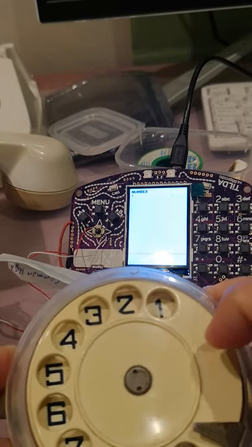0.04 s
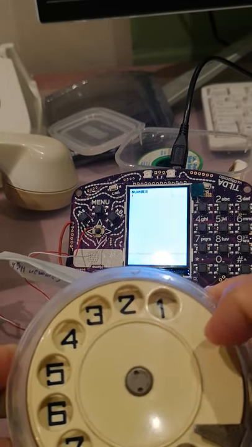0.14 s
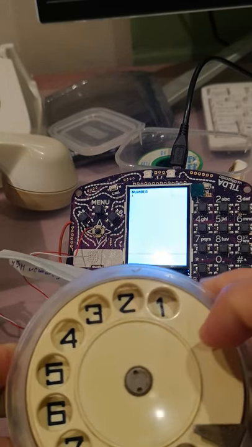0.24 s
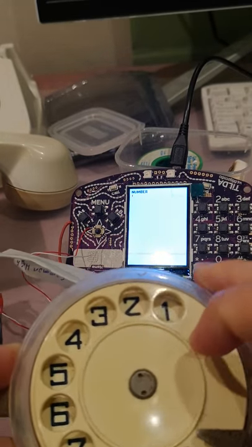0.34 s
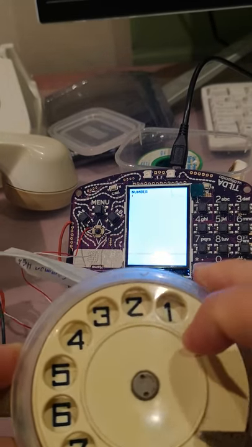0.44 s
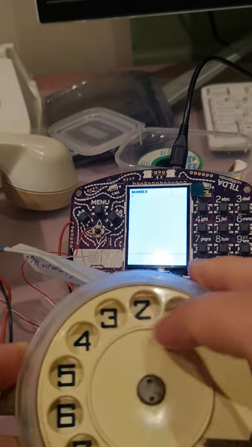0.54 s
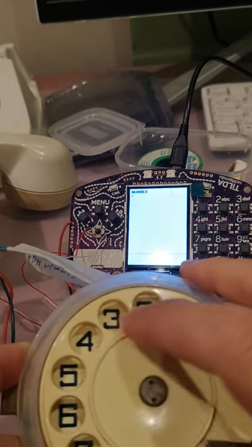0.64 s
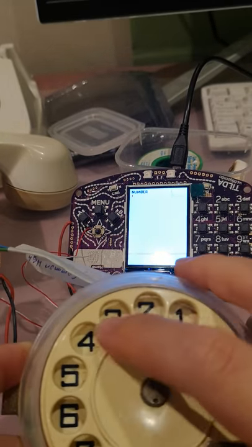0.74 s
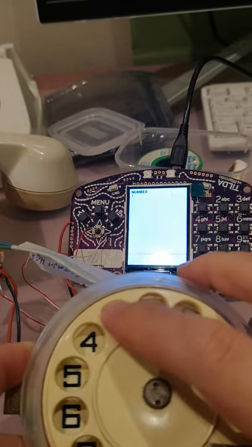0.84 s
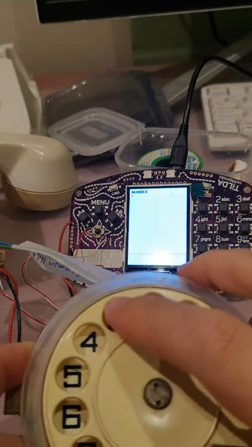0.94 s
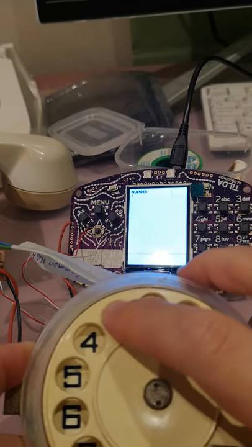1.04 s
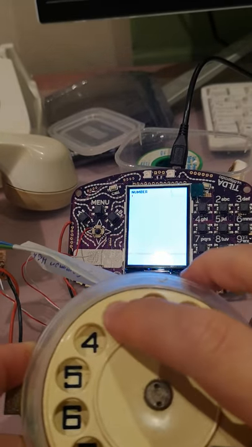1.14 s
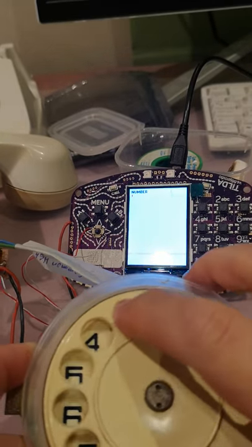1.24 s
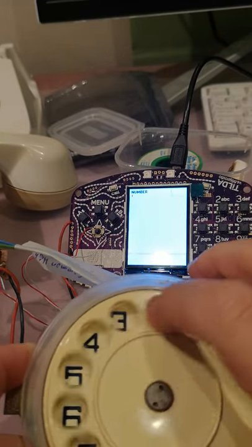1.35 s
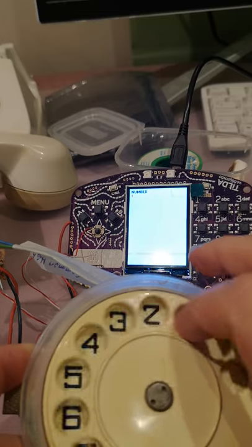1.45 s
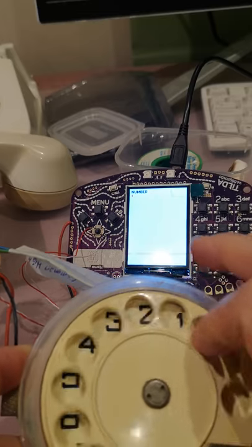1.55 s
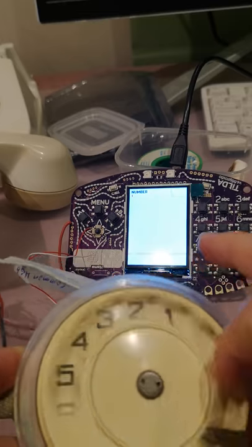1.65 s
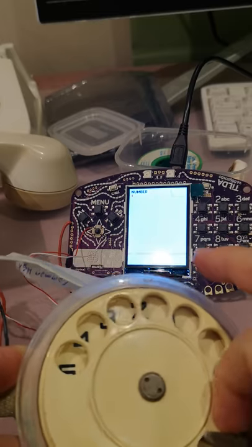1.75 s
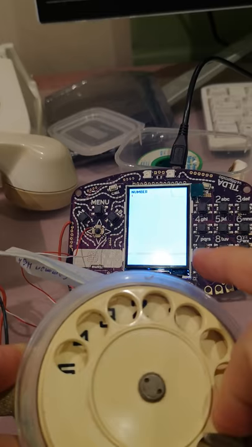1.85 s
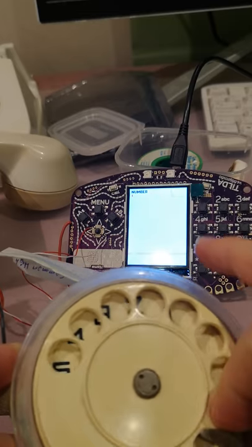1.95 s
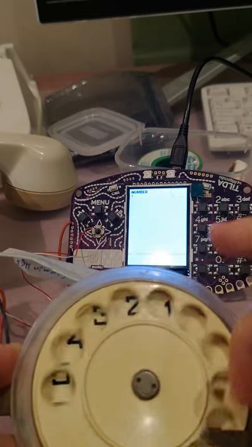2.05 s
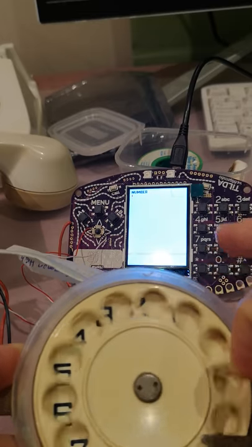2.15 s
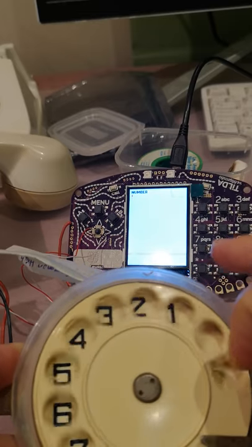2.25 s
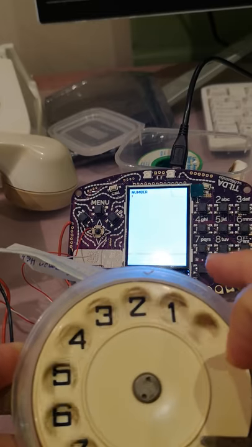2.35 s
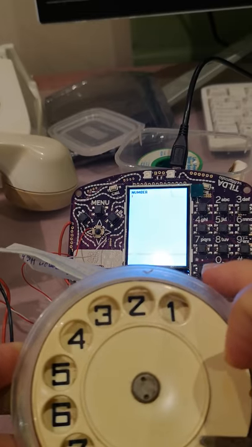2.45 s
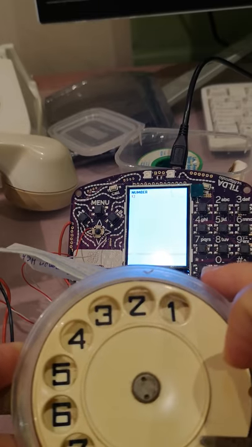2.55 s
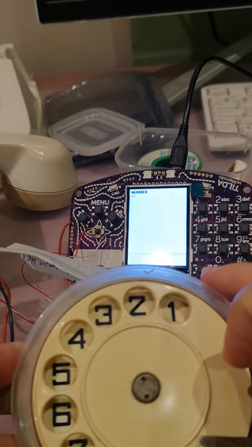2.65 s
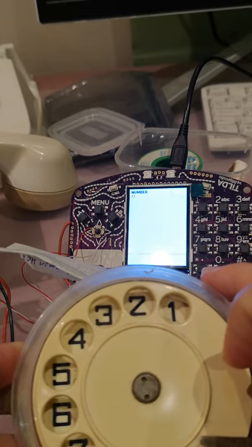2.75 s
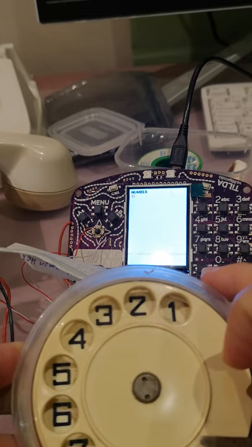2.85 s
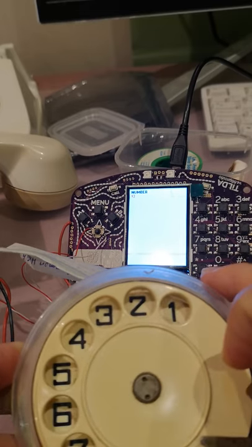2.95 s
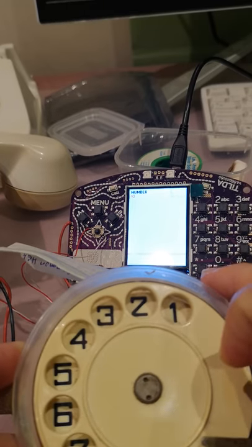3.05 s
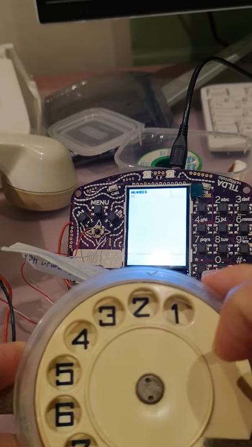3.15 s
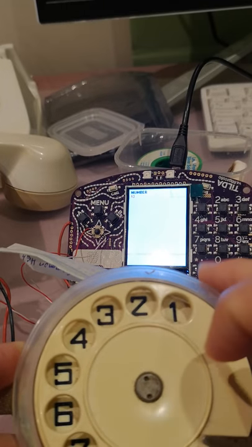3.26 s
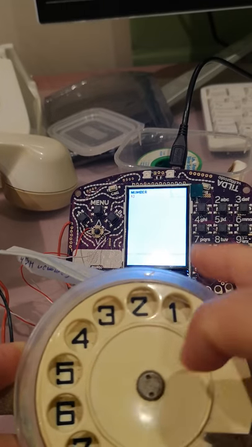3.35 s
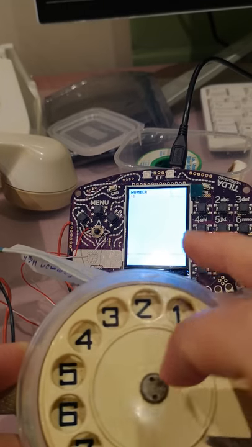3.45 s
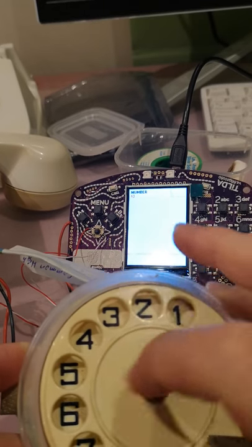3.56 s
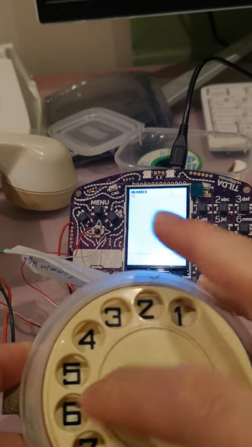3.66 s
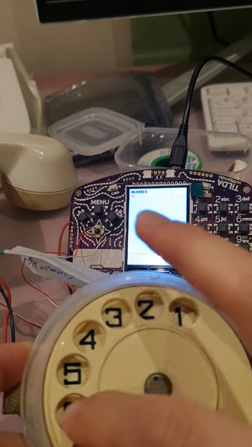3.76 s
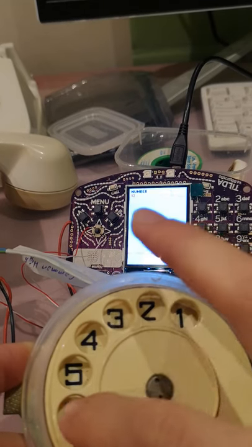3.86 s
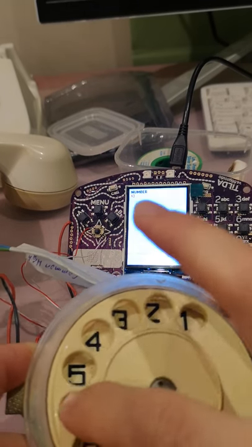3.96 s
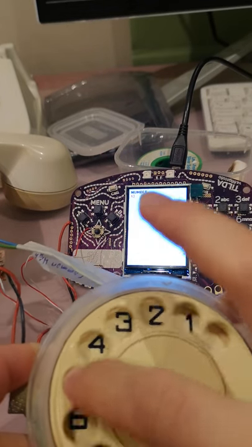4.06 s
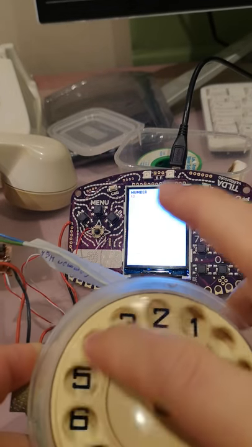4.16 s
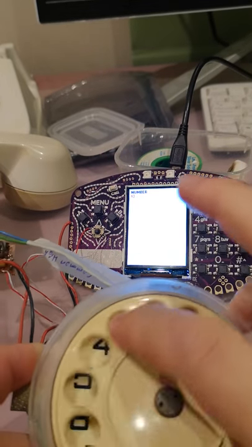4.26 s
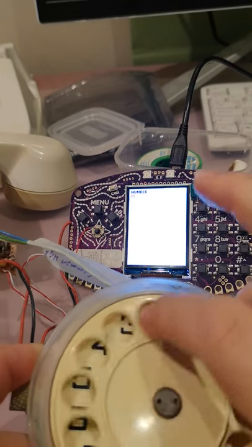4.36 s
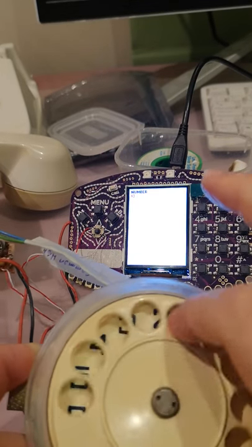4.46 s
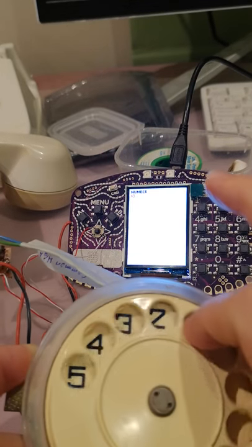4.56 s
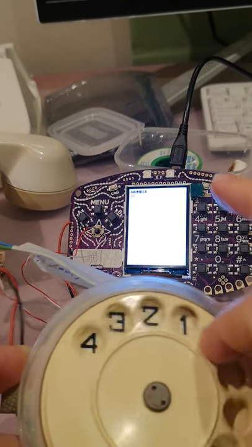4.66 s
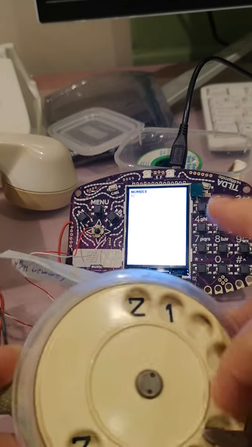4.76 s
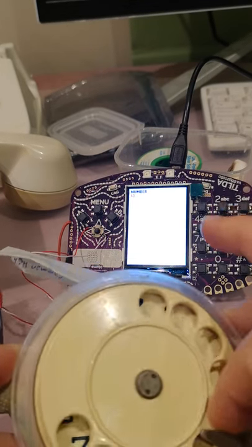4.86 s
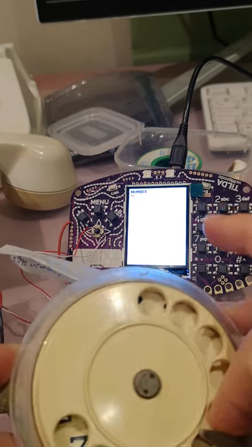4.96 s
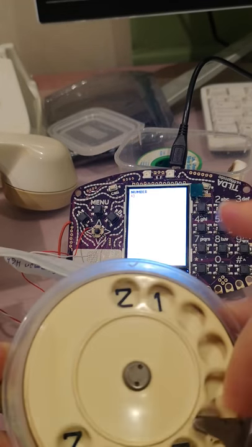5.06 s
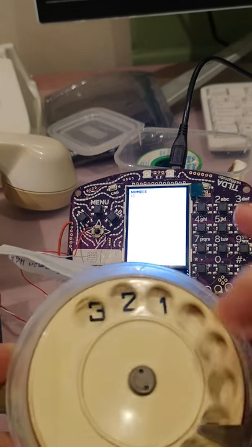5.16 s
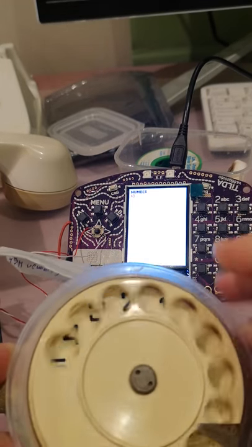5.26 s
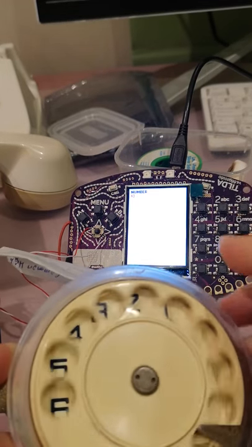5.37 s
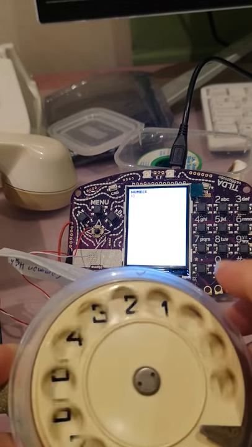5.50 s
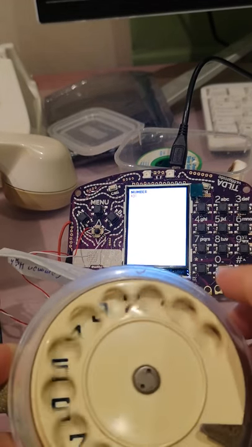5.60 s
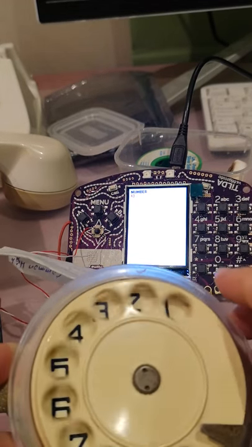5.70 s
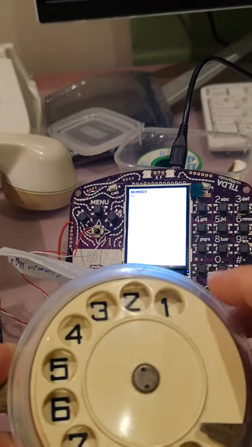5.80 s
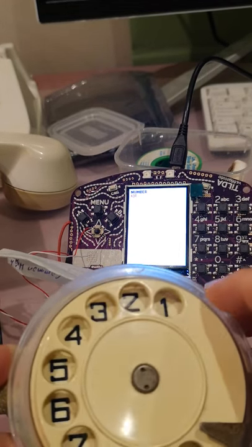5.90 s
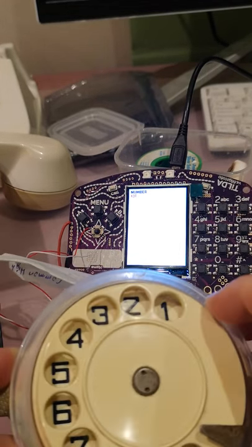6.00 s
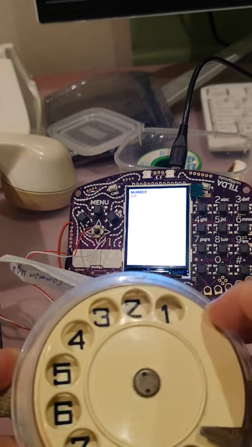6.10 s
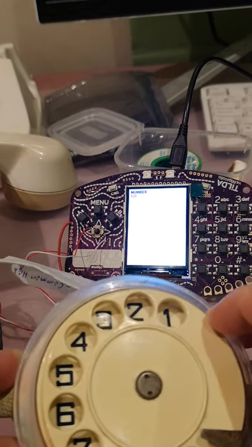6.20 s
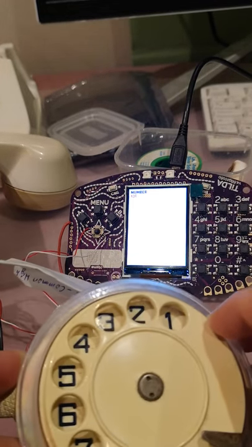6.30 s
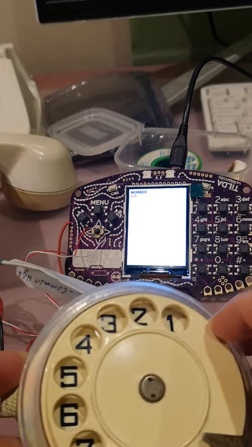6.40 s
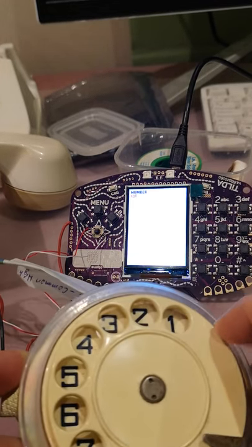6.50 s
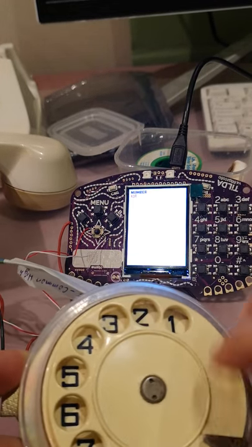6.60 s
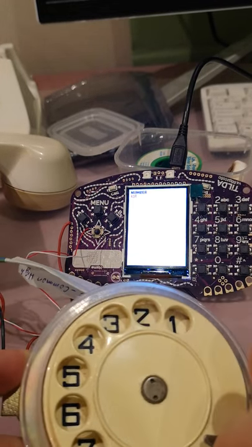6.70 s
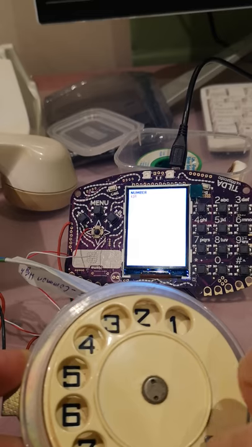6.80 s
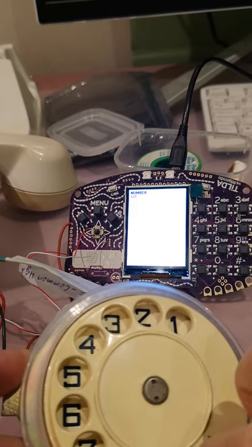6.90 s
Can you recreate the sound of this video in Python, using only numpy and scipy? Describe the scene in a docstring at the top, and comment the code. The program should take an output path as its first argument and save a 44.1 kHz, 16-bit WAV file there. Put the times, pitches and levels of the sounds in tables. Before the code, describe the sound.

A rotary phone dial handled close up: faint finger rubs and case ticks, then a short burst of metallic ratcheting ending in a hard click. The wheel springs back with a buzzing friction whirr, bumps its stop and clicks slower and weaker. A quiet gap, then a longer wind and longer return. Small dry room, soft low rumble, slight hiss and short reflections.

```python
"""In a small quiet room, a bare rotary telephone dial held close to the microphone dials two digits.
Winding drags a pawl over its ratchet; let go, the wheel spins home against a whirring friction governor,
knocks on its stop, and the gear train coasts on with slowing ratchet clicks. Hands tick and rub on the dial.
Blows and random slips ring filters for the wheel, case and pawl; coloured noise makes the room tone."""
import sys
import numpy as np
from scipy import signal
from scipy.fft import rfft, irfft
from scipy.io import wavfile

SR = 44100
rng = np.random.default_rng(int(sys.argv[2]) if len(sys.argv) > 2 else 0)


def to_wav(sig):
    """Store sig (one row per channel, or 1-D mono) as 16-bit WAV at the path in sys.argv[1].

    Samples outside -1..1 are clipped; the rate is SR.
    """
    pcm = np.clip(np.atleast_2d(sig), -1, 1) * 32767
    pcm = np.round(pcm).astype(np.int16)
    wavfile.write(sys.argv[1], SR, pcm.T)  # frames by channels


N = 306054
SIZE = 2048  # samples in the sound of one contact

# resonances of the dial's wheel and case: pitch_hz, width_hz, left_lift_db, right_lift_db
CASE_MODES = [(782.6, 140, 1, 8.5), (1070, 260, 14.5, 15.5), (1510, 130, -3, 3.5), (1660, 450, -4.5, 1),
              (2187, 220, 3.5, -8.5), (2870, 240, 10, 5), (3090, 200, -8, -6), (4590, 130, 6, -2.5),
              (6265, 780, -4, 2.5), (7660, 890, 9, 4), (9200, 700, 3.5, 8)]
# force spectrum of clicking small parts and of the wheel let go: pitch_hz, level_db
CLICK_FORCE = [(200, -42), (700, -17), (1500, -5.5), (2600, -1.5), (3500, 8), (5000, -9.5), (8000, -8.5),
               (11000, -23.5), (16000, -42)]
# force spectrum of rubbing parts: pitch_hz, level_db
RUBBING_FORCE = [(150, -45.5), (450, -28), (800, -9.5), (1400, 1), (2600, 4.5), (3600, 3), (5200, -6.5),
                 (8000, -19.5), (11000, -31), (16000, -36)]


def amp(db):
    """Decibels to gain."""
    return 10 ** (np.asarray(db) / 20)


def colour(points, size):
    """A (Hz, dB) curve, drawn over log frequency, at the frequencies of a transform."""
    hz, db = np.transpose(points)
    return np.interp(np.log(np.fft.rfftfreq(size, 1 / SR) + 1), np.log(hz), db)


def unit(x):
    """Scale to rms 1."""
    return x / np.sqrt(np.mean(x ** 2))


def noise(points):
    """Noise of a given colour, rms 1."""
    spectrum = rfft(rng.standard_normal(N)) * amp(colour(points, N))
    return unit(irfft(spectrum, N))


def walk(rate):
    """Random wander with a spread near 1: straight lines between this many random points per second."""
    return np.interp(np.arange(N) / SR * rate, np.arange(N // 100), rng.standard_normal(N // 100))


def hump(t, middle_s, width_s):
    """A smooth rise and fall, 1 at its middle."""
    return np.exp(-((t - middle_s) / width_s) ** 2)


def motion(t, start_s, stop_s, rise_s, fall_s):
    """Loudness of a part that speeds up, runs steadily and, from stop_s, coasts to a halt."""
    rise = np.clip((t - start_s) / rise_s, 0, 1)
    fall = np.clip(1 - (t - stop_s) / fall_s, 0, 1)
    return (rise * fall) ** 2


def add(out, s, sound):
    """Mix a short sound in at time s."""
    i = int(s * SR)
    out[:, i:i + sound.shape[-1]] += sound[..., :N - i]


def convolve(x, response):
    """Pass a signal through a two-channel response."""
    return signal.fftconvolve(np.atleast_2d(x), response, axes=1)[:, :N]


def room_tone():
    """A wavering low rumble and a fading drone, each alike at both ports, under faint, mostly separate hiss."""
    t = np.arange(N) / SR
    # spectra of the rumble and of the hiss: pitch_hz, level_db_per_hz
    rumble_colour = [(12, -1), (25, 4.5), (40, -6.5), (60, -8), (80, -19.5), (105, -13), (150, -16.5),
                     (220, -20.5), (300, -28.5), (450, -39.5), (900, -68)]
    hiss_colour = [(30, -11.5), (130, 3), (250, 3), (400, -7.5), (600, -10.5), (1100, -9.5), (2400, -9.5),
                   (5000, -19), (10000, -25), (16000, -29.5)]
    # level of the rumble before it wavers: time_s, level_db
    rumble_level = [(0, -51), (1.6, -44.5), (2.4, -47.5), (3.3, -59.5), (4.6, -55), (5.55, -54.5), (6, -60),
                    (6.94, -64)]
    waver_db = 1.2 * walk(14)
    rumble = noise(rumble_colour) * amp(np.interp(t, *np.transpose(rumble_level)) + waver_db)
    # the drone holds, then dies away; early on it swells once
    hold_s, fade_db_per_s = 1.68, 5.5
    swell_at_s, swell_width_s, swell_db = .775, .045, 16.5
    drone_db = -58.5 - fade_db_per_s * np.maximum(t - hold_s, 0)
    drone_db = drone_db + swell_db * hump(t, swell_at_s, swell_width_s)
    drone_colour = [(150, -57), (176, -22.0), (188, 0.5), (200, -11.0), (240, -31.5), (500, -85.5)]
    drone = noise(drone_colour) * amp(drone_db)
    shared_hiss = noise(hiss_colour) * amp(-85.5)
    separate_hiss = np.array([noise(hiss_colour), noise(hiss_colour)]) * amp(-69.5)
    return rumble + drone + shared_hiss + separate_hiss


def reflections(x, db, t60, delay_s, tone):
    """Diffuse echoes as decaying coloured noise, unrelated at the two ports."""
    t = np.arange(SR // 2) / SR
    tail = irfft(rfft(rng.standard_normal((2, len(t)))) * amp(colour(tone, len(t))), len(t))
    # silent until delay_s, full at twice that
    tail = tail * amp(-60 * t / t60) * np.clip(t / delay_s - 1, 0, 1)
    return amp(db) * convolve(x, unit(tail) / np.sqrt(len(t)))


def around_recorder(x, bends=((4900, 3.5), (8400, 5))):
    """Treble bends round the recorder and reaches the right port out of step: all-passes (Hz, Q)."""
    right = x[1]
    for hz, q in bends:
        _, poles = signal.iirpeak(hz, q, fs=SR)
        right = signal.lfilter(poles[::-1], poles, right)
    return np.array([x[0], right])


def body(force, modes, shadow):
    """Causal, minimum-phase response of the dial to one contact, at both ports; mean energy 1."""
    # the right port faces away and loses treble, by a share that each contact sets: pitch_hz, level_db
    port_shadow = [(1000, -1.5), (2000, 0.5), (2800, -2), (4200, -1), (6000, -11), (8000, -7.5),
                   (10000, 1.5)]
    f = np.fft.rfftfreq(SIZE, 1 / SR)
    db = colour(force, SIZE) + np.outer([0, shadow], colour(port_shadow, SIZE))
    for hz, width, left_db, right_db in modes:
        db = db + np.outer([left_db, right_db], 1 / (1 + (2 * (f - hz) / width) ** 2))
    cepstrum = irfft(np.log(amp(db)))[:, :SIZE // 2]
    response = irfft(np.exp(2 * rfft(cepstrum, SIZE)))
    return unit(response) / np.sqrt(SIZE)


def shifted(modes, share):
    """The same resonances, all moved by a share of their frequency."""
    return np.array(modes) * [1 + share, 1, 1, 1]


def strikes(table, force_db, modes, shadow, chatter_s, scrape, detune, count, vary_db=0.0, pressed=0.017):
    """Each blow is a few quick bounces that grow and fade, with scraping; levels are rms over 5 ms."""
    out, t = np.zeros((2, N)), np.arange(SIZE) / SR / chatter_s
    treble = colour([(4500, 0), (6500, 1)], SIZE)
    window = .005 * SR
    for s, db, bright_db in table:
        # every blow lands a little differently and shifts and may reweight the resonances
        seated = shifted(modes, detune * rng.standard_normal())
        seated[:, 2:] += vary_db * rng.standard_normal((len(modes), 2))
        # a bright, scraping blow stays pressed on and rings less
        seated[:, 2:] *= 1 - pressed * bright_db
        # part of the scraping is common to both ports, part is separate
        grain = rng.standard_normal((3, SIZE))
        force = scrape * (grain[0] + 1.2 * grain[1:]) * t * np.exp(-2 * t ** 2)
        bounces = (np.arange(count) + rng.random(count)) / count
        bounce_at = (bounces * chatter_s * SR).astype(int)
        force[:, bounce_at] += rng.choice([-1, 1], count) * np.sin(np.pi * bounces)
        sound = irfft(rfft(force) * rfft(body(force_db, seated, shadow)) * amp(bright_db * treble))
        add(out, s, unit(sound) * np.sqrt(window / SIZE) * amp(db))
    return out


def friction(response, rate, spread_db, apart):
    """Tiny slips of random size, rate per second, ring the dial; a share reaches each port separately."""
    slips = (rng.random((3, N)) < rate / SR) * rng.choice([-1, 1], (3, N))
    slips = slips * amp(spread_db * np.clip(rng.standard_normal((3, N)), -2, 2))
    return unit(convolve(slips[0] + apart * slips[1:], response))


def roaming(force_db, shadow, rate, spread_db, apart, detune, swell_db, count):
    """Friction at several spots, each with its own pitch of ring, that take over from one another."""
    spots = []
    for share in np.linspace(-detune, detune, count):
        response = body(force_db, shifted(CASE_MODES, share), shadow)
        spots.append(friction(response, rate, spread_db, apart))
    weights = np.array([amp(swell_db * walk(60)) for _ in spots])
    weights /= np.sqrt(np.sum(weights ** 2, axis=0))
    return sum(w * spot for w, spot in zip(weights, spots))


def fingers():
    """Short dull slides of a fingertip on the plastic: many tiny slips of skin ring the case."""
    # each slide: middle_s, length_s, level_db
    slides = [(0.373, 0.04, -56.5), (1.104, 0.026, -64), (1.295, .03, -62.5), (3.337, 0.045, -60),
              (6.677, 0.18, -70)]
    t = np.arange(N) / SR
    touch = sum(amp(db) * hump(t, s, length / 2) for s, length, db in slides)
    skin = [(300, -3), (650, -25), (930, -3.5), (1250, -6.5), (2500, 2.5), (4500, -9.5), (9000, -19.5),
            (16000, -60)]
    return touch * friction(body(skin, CASE_MODES, shadow=0.95), rate=9000, spread_db=3.0, apart=1.0)


def hand_ticks():
    """The case ticks in the hand: very short contacts ring it faintly."""
    # each tick: start_s, level_db, brightness_db
    ticks = [(.2425, -58.5, -12), (.2695, -50, -5), (.2925, -51, -9), (4.899, -47, -8.5), (4.919, -53, -20),
             (6.4455, -59.5, 5), (6.6105, -53, 1)]
    # force spectrum: pitch_hz, level_db
    tick_force = [(200, -38), (800, -11), (1100, -31), (1400, 8.5), (2400, 1.5), (4000, -8), (7000, -20),
                  (16000, -43)]
    return strikes(ticks, tick_force, CASE_MODES, shadow=0.17, chatter_s=0.00081, scrape=0.88,
                   detune=0.053, count=2)


def gears():
    """The gear train rubs softly while the wheel is wound."""
    # each run: start_s, stop_s, level_db
    gear_runs = [(1.314, 1.805, -49.5), (4.02, 4.864, -52.5)]
    rise_s, fall_s = 0.077, 0.057
    t = np.arange(N) / SR
    rub = friction(body(RUBBING_FORCE, CASE_MODES, shadow=.8), rate=840, spread_db=8.5, apart=0.47)
    return rub * sum(amp(db) * motion(t, start_s, stop_s, rise_s, fall_s) for start_s, stop_s, db in gear_runs)


def spring(hz=1168, beat_hz=11, t60=0.5):
    """The return spring sings briefly in two close modes as it takes up the load."""
    out, t = np.zeros((2, N)), np.arange(SR // 2) / SR
    ring = np.sin(2 * np.pi * hz * t) + 0.26 * np.sin(2 * np.pi * (hz - beat_hz) * t)
    for s, db, rise_s in [(2.052, -40.5, 0.0079), (5.092, -42.5, 0.0065)]:
        add(out, s, ring * amp(db - 60 * t / t60) * (1 - np.exp(-t / rise_s)))
    return out


def small_part_clicks():
    """Small parts of the dial click at uneven moments during the return and ring the case."""
    # each click: start_s, level_db, brightness_db
    part_clicks = [(2.099, -40, 1), (2.1355, -32.5, 2), (2.3015, -30.5, -3), (2.382, -31, 7),
                   (5.164, -38, 16), (5.292, -31, 6), (5.312, -32, -18), (5.3285, -34, -8),
                   (5.673, -32.5, -5.5)]
    return strikes(part_clicks, CLICK_FORCE, CASE_MODES, shadow=1.3, chatter_s=0.0025, scrape=0.22,
                   detune=0.051, count=3)


def finger_releases():
    """The finger lets the wheel go with a scraping click that rings the case."""
    # each release: start_s, level_db, brightness_db
    releases = [(2.0503, -28.5, -8.5), (5.0815, -52.5, -5.5), (5.0848, -34, -2)]
    return strikes(releases, CLICK_FORCE, CASE_MODES, shadow=0.96, chatter_s=.0042, scrape=0.89,
                   detune=0.012, count=4)


def wheel_stops():
    """The wheel knocks at an end of its travel and rings the case."""
    # each knock: start_s, level_db, brightness_db
    knocks = [(1.7399, -34.5, 4.5), (2.5113, -22.5, -1.5), (5.7988, -22.5, -3.5)]
    # force spectrum: pitch_hz, level_db
    knock_force = [(200, -38.5), (500, -27), (800, -12), (1080, -4.5), (1400, 4), (2100, 6.5), (2900, -4.5),
                   (5500, -6.5), (8000, -21), (11000, -30.5), (16000, -33.5)]
    return strikes(knocks, knock_force, CASE_MODES, shadow=0.36, chatter_s=.002, scrape=1.1,
                   detune=0.011, count=3)


def governor():
    """Flyweights rub inside their cup, harder once a turn, and catch on grit in short spurts."""
    # the wheel spins home: governor_start_s, wheel_stop_s, rubbing_db, grit_db, extra_grit_at_first_db
    spins = [(2.083, 2.511, -38.5, -44.5, 8), (5.108, 5.805, -39, -43, 1)]
    # force spectrum of the grit: pitch_hz, level_db
    grit_force = [(500, -27), (3000, -25), (5200, -1), (7000, 8.5), (8500, 6.5), (9800, -3.5),
                  (11000, -12.5), (14000, -15), (16000, -38)]
    turns_per_s = 21  # on average; the wobble below sways it
    spin_up_s, run_down_s, grit_run_down_s = 0.061, 0.24, 0.057
    # the flyweights first overshoot and bite harder: time after the start, and half width
    surge_at_s, surge_width_s = .102, .06
    t = np.arange(N) / SR
    spurts, wobble = walk(260), 0.059 * walk(12)  # wobble in turns
    rub = roaming(RUBBING_FORCE, shadow=0.94, rate=1200, spread_db=-1.0, apart=0.5,
                  detune=0.026, swell_db=8, count=3)
    grit = roaming(grit_force, shadow=0.91, rate=300, spread_db=12.5, apart=1.0,
                   detune=0.048, swell_db=3.5, count=3)
    grit = unit(grit * amp(2.4 * spurts))
    # the wheel's low ring and its rasp swell separately
    low = signal.sosfiltfilt(signal.butter(2, 1700, fs=SR, output="sos"), rub)
    ring = low * amp(1.2 * walk(79))
    rasp = (rub - low) * amp(1.2 * walk(90))
    out = 0
    for start_s, stop_s, rub_db, grit_db, surge_db in spins:
        turn = np.cos(2 * np.pi * (turns_per_s * (t - start_s - surge_at_s) + wobble))
        surge = surge_db * hump(t, start_s + surge_at_s, surge_width_s)
        rubbing = unit((ring + rasp * amp(1.4 * turn + 0.33 * surge)) * amp(2.4 * spurts))
        out = out + rubbing * amp(rub_db) * motion(t, start_s, stop_s, spin_up_s, run_down_s)
        grit_gain = amp(grit_db + surge + 2.8 * turn)
        out = out + grit * grit_gain * motion(t, start_s, stop_s, spin_up_s, grit_run_down_s)
    return out


def tooth_marks(first, last, drop_share):
    """Places along the ratchet, in teeth, where the pawl lifts (whole numbers) or drops."""
    marks = np.add.outer(np.arange(int(last) + 1), [0, drop_share]).ravel()
    slack = 1e-6
    return marks[(marks > first - slack) & (marks < last + slack)]


def pawl_clicks(times, marks, lift_db, drop_db):
    """Rows (s, level dB, brightness dB): bright lifts and dull drops alternate, and harder clicks are duller."""
    lift_bright_db, drop_bright_db = 3, -1.46
    level_scatter_db, bright_scatter_db = -1.8, -1.8
    dulling, dull_above_db = 0.68, -35  # dB of brightness lost for each dB that a click is harder than this
    drops = marks % 1 > 0
    chance = rng.standard_normal((len(marks), 2))
    db = np.where(drops, drop_db, lift_db) + level_scatter_db * chance[:, 0]
    bright_db = np.where(drops, drop_bright_db, lift_bright_db)
    bright_db = bright_db - dulling * np.maximum(db - dull_above_db, 0)
    bright_db = bright_db + bright_scatter_db * chance[:, 1]
    return np.column_stack([times, db, bright_db])


def winding_clicks():
    """While the finger winds the wheel, the pawl clicks at the finger's pace and force."""
    # how far the finger has wound the wheel, a list for each digit: time_s, teeth_passed
    wind_travel = [
        [(1.3105, .35), (1.389, 2.35), (1.452, 5), (1.492, 6.35), (1.606, 9), (1.669, 11), (1.7173, 13.35),
         (1.757, 16), (1.8057, 16.35)],
        [(4.0123, 0), (4.0805, 1), (4.122, 2), (4.276, 8), (4.323, 9), (4.391, 11.46), (4.413, 12),
         (4.511, 15.46), (4.6894, 19.46), (4.746, 21.46), (4.8217, 28), (4.881, 30), (4.9416, 30.46)],
    ]
    # how hard the pawl strikes before scatter, a list for each digit: time_s, lift_db, drop_db
    wind_force = [
        [(1.31, -37, -33.5), (1.42, -31.5, -33), (1.55, -33, -31), (1.61, -36, -28), (1.68, -31.5, -32.5),
         (1.735, -22.5, -22), (1.76, -39, -33.5), (1.81, -35, -32.5)],
        [(4.01, -40, -38.5), (4.25, -34, -34.5), (4.32, -32.5, -32.5), (4.46, -33, -30), (4.65, -31.5, -29.5),
         (4.8, -31.5, -31), (4.865, -42, -29), (4.94, -23, -34.5)],
    ]
    # share of a tooth between the pawl's lift and its drop, one for each winding: drop_share_teeth
    wind_drop_share = [.35, .46]
    clicks = []
    for travel, force, drop_share in zip(wind_travel, wind_force, wind_drop_share):
        s, teeth = np.transpose(travel)
        marks = tooth_marks(teeth[0], teeth[-1], drop_share)
        times = np.interp(marks, teeth, s)
        at_s, lift_db, drop_db = np.transpose(force)
        lifts, drops = np.interp(times, at_s, lift_db), np.interp(times, at_s, drop_db)
        clicks.append(pawl_clicks(times, marks, lifts, drops))
    return clicks


def coasting_clicks():
    """After the stop the gear train runs on; its speed decays and the clicks slow, weaken and dull."""
    # each coast: first_click_s, speed_teeth_per_s, slowing_time_s, drop_share_teeth, teeth_passed
    coasts = [(2.5313, 42.65, .1544, .486, 4.6), (5.8235, 44.13, .1434, .373, 5.1)]
    stall_teeth_per_s = 13.5  # near and below this speed the clicks weaken
    stall_dulling = 0.28  # dB of brightness lost per dB weakened
    clicks = []
    for start_s, first_speed, slowing_s, drop_share, teeth in coasts:
        marks = tooth_marks(0, teeth, drop_share)
        speed = first_speed - marks / slowing_s
        times = start_s + slowing_s * np.log(first_speed / speed)
        rows = pawl_clicks(times, marks, lift_db=-30.5, drop_db=-27.5)
        stall_db = 20 * np.log10(np.tanh((speed / stall_teeth_per_s) ** 2))
        rows[:, 1] += stall_db
        rows[:, 2] += stall_dulling * stall_db
        clicks.append(rows)
    return clicks


def ratchet():
    """The pawl lifts and drops over each tooth; every click rings the steel pawl and the case."""
    # resonances of the steel pawl: pitch_hz, width_hz, left_lift_db, right_lift_db
    pawl_modes = [(2961, 110, 11.3, 7.5), (3500, 450, 13.4, 9.3), (4660, 550, 3, 0.67),
                  (14800, 600, 8, 8.1)]
    # force spectrum of the pawl: pitch_hz, level_db
    pawl_force = [(200, -39.5), (600, -29.5), (1050, -23.5), (1600, -13.5), (2500, -3), (4100, 3.5),
                  (5000, 1), (5600, -6), (7000, -3), (9700, -6), (11200, -19.5), (16000, -22.5)]
    clicks = np.vstack(winding_clicks() + coasting_clicks())
    return strikes(clicks, pawl_force, CASE_MODES + pawl_modes, shadow=0.64, chatter_s=0.0028, scrape=0.58,
                   detune=0.017, count=6)


def scene():
    """The dial, its echoes from the desk and the walls, and the room tone."""
    dial = fingers() + hand_ticks() + gears() + spring() + small_part_clicks()
    dial = dial + finger_releases() + wheel_stops() + governor() + ratchet()
    dial = around_recorder(dial)
    desk = reflections(dial, db=-3.0, t60=.018, delay_s=0.00031,
                       tone=[(500, -6.5), (2500, -2.5), (5000, -1.5), (14000, 2)])
    walls = reflections(dial, db=-9.5, t60=0.15, delay_s=0.002,
                        tone=[(500, 2), (3000, -3.5), (8000, 3.5), (15000, -6.5)])
    return room_tone() + walls + desk + dial


def record(dry):
    """The recorder cuts the top with a steep low-pass."""
    top_hz = 15900
    return signal.sosfilt(signal.ellip(10, .2, 70, top_hz, fs=SR, output="sos"), dry)


dry = scene()
out = record(dry)
to_wav(out)
```